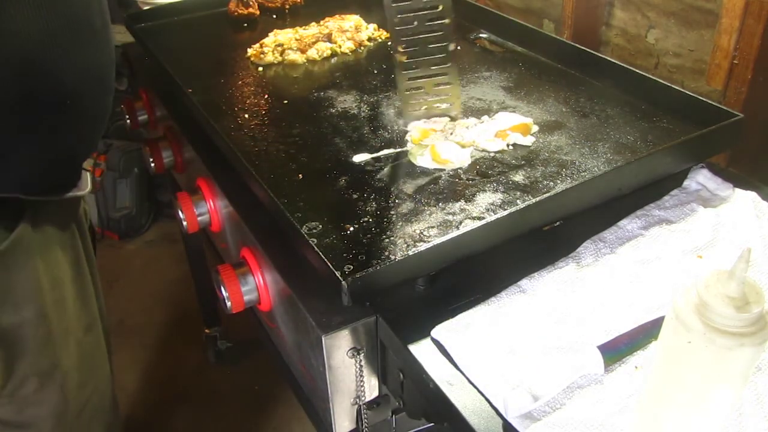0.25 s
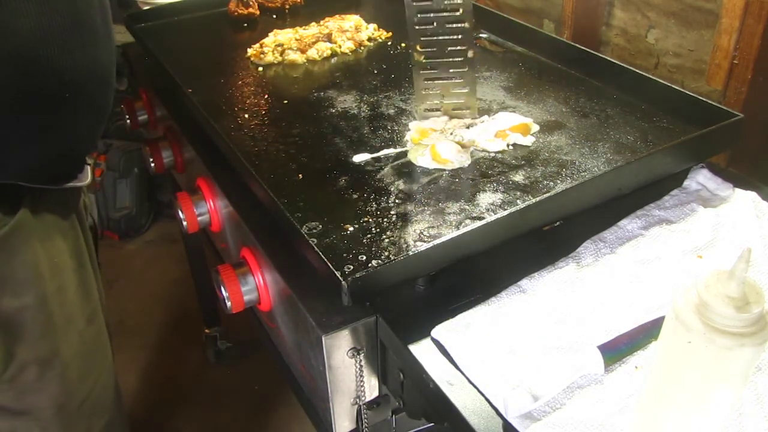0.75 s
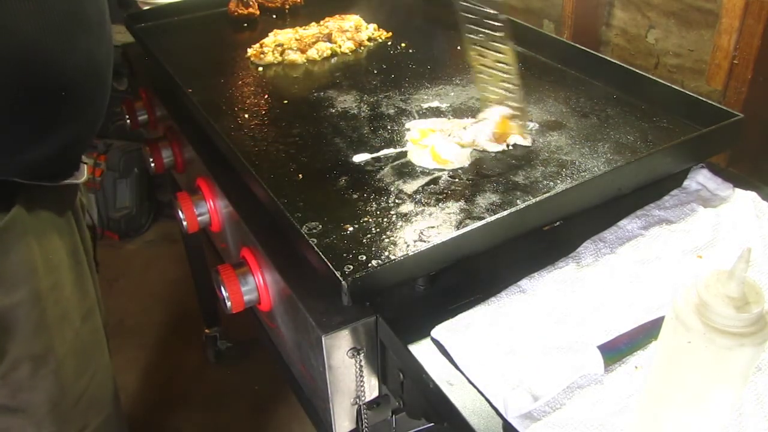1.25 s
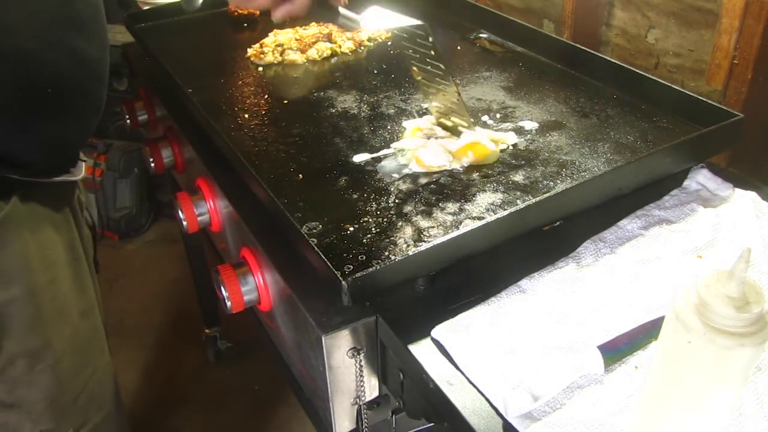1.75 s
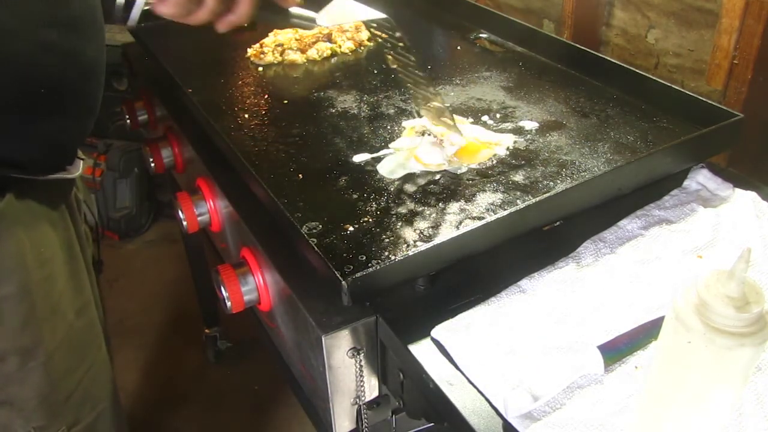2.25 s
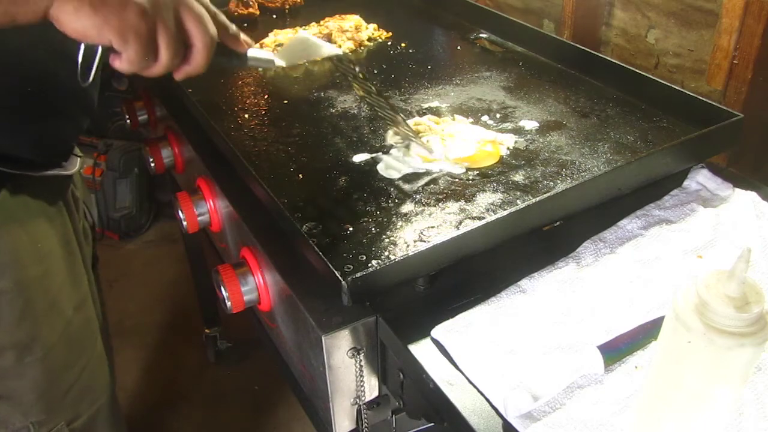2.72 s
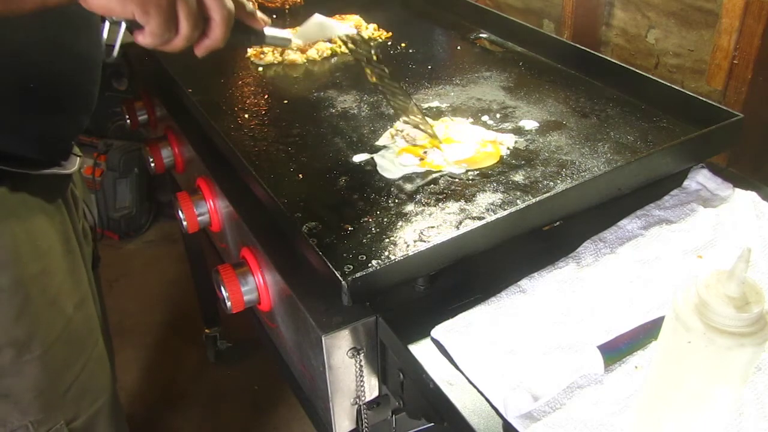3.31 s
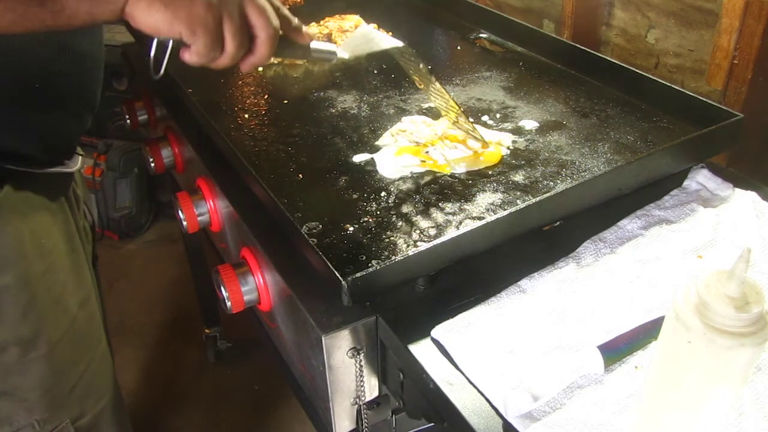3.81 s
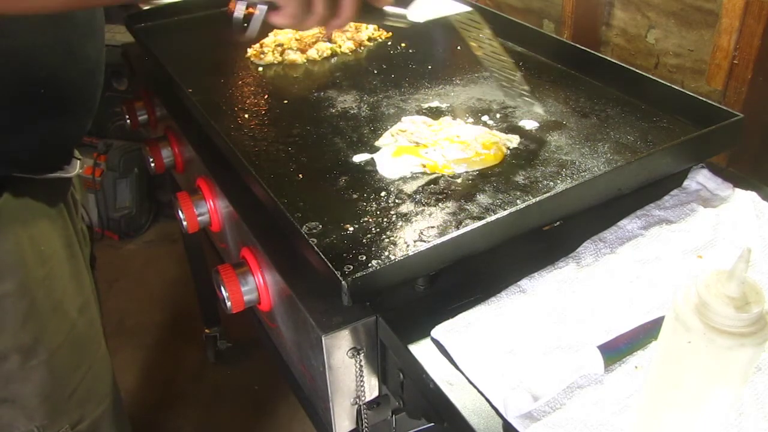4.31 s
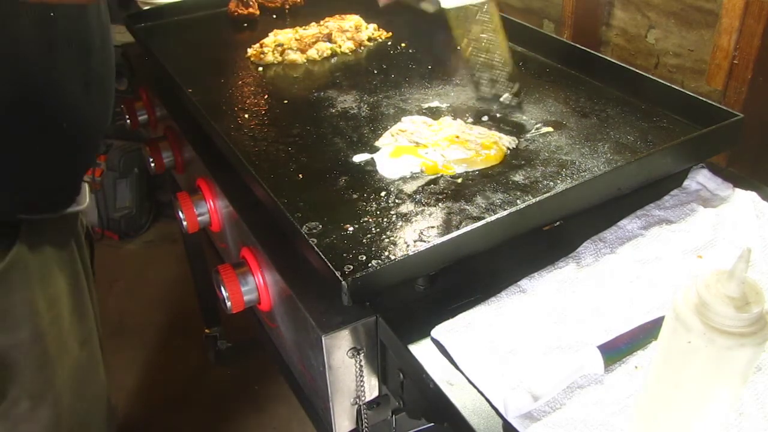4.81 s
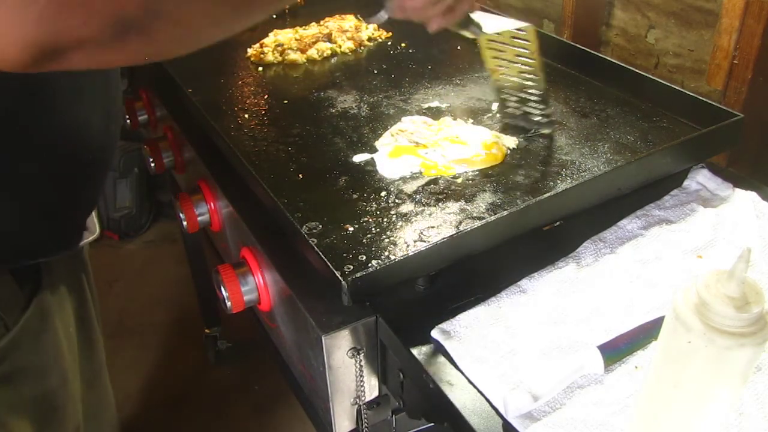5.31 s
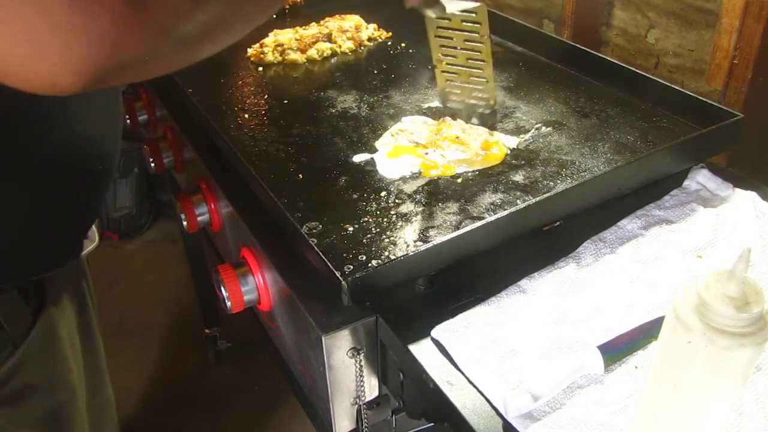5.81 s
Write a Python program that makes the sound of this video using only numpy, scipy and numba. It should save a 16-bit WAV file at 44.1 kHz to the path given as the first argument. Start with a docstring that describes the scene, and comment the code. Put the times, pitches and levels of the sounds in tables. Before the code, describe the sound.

For about six seconds, fat fries with a steady, bright hiss full of fine crackle, spread in stereo, above a very faint low burner rumble. Sharp, dry spits crowd the first 0.8 seconds, then scatter. A steel spatula touches the griddle dully at 0, slides grittily around 0.2, lands softly at 0.5 with another short singing scrape, and clanks more firmly at 1.1 before a fainter scrape. After a light touch at 1.7, chopping blows come from 2.05 to 4.0, roughly every 0.3 seconds, the first three brightest, later ones weaker. A clank at 4.4 leads into a brief scrape; the loudest clang rings at 4.8. Quick taps follow at 5.2 to 5.3 and a double tap at 5.6, each with a short slide, the last fading by 5.9. The metallic, inharmonic rings decay fast, with a short wooden-shed tail, as the sizzle eases slightly.

```python
"""Spatula on a hot griddle

A steel spatula chops and scrapes eggs on a flat steel griddle in a shed, for about six seconds.
Blows and slides of the blade ring the plate's many modes, each a decaying sine wave.
Fat spits in short pops and sizzles in filtered noise and clicks, over a soft burner rumble."""
import sys
import numpy as np
from scipy import signal
from scipy.fft import rfft, irfft, next_fast_len
from scipy.io import wavfile
from scipy.ndimage import uniform_filter1d
from numba import njit

SR = 44100
rng = np.random.default_rng(int(sys.argv[2]) if len(sys.argv) > 2 else 0)


def to_wav(s):
    """Save 16-bit WAV."""
    ch = np.atleast_2d(s).T  # columns
    pcm = np.round(np.clip(ch, -1, 1) * 32767)  # PCM
    wavfile.write(sys.argv[1], SR, pcm.astype(np.int16))


N = 266871  # samples


def undb(db):
    """Turn decibels into gain."""
    return 10 ** (np.asarray(db) / 20)


def level(x, db):
    """Scale a sound to an rms level in dB."""
    return x * undb(db) / np.sqrt(np.mean(x ** 2))


def on_log(hz, table, axis=1):
    """Read a table column between its rows, on a log-frequency axis."""
    rows = np.array(table, float)
    return np.interp(np.log(np.maximum(hz, 1)), np.log(rows[:, 0]), rows[:, axis])


def colour(x, table):
    """Filter a sound by a table of frequency in Hz and gain in dB."""
    size = next_fast_len(N)
    gain = undb(on_log(np.fft.rfftfreq(size, 1 / SR), table))
    return irfft(rfft(x, size) * gain, size)[..., :N]


def walk(rate):
    """Random wandering: values held for 1 / rate seconds, then smoothed twice; spread near 1."""
    hold = int(SR / rate)
    steps = np.repeat(rng.standard_normal(N // hold + 1), hold)
    smooth = uniform_filter1d(uniform_filter1d(steps, hold), hold)
    return np.sqrt(2) * smooth[:N]


# Colour of the flame rumble. Each row: frequency in Hz, relative gain in dB.
BURNER_COLOUR = [(15, -41), (25, 1), (43, -10), (65, 3), (118, 8), (178, -4.5), (199, 5), (289, -2.5),
                 (352, 4.5), (400, -37), (520, -52), (880, -120)]


def burner():
    """Low flame rumble: dark noise, almost the same on both sides, slowly wavering in level."""
    mid, side = colour(rng.standard_normal((2, N)), BURNER_COLOUR)
    pair = np.array([0.81 * mid + 0.053 * side, 0.95 * mid - 0.14 * side])
    waver_db = 0.55 * walk(2.66)
    return level(pair, -60.5) * undb(waver_db)


def crackle(rate, spread_db):
    """Bursting bubbles as clicks at random moments (rate per second), many small and few large."""
    size_db = spread_db * np.minimum(rng.exponential(size=N), 3.5)
    clicks = (rng.random(N) < rate / SR) * undb(size_db) * rng.choice([-1, 1], N)
    return level(clicks, 0)


# How the frying rises and falls; only changes around each column's mean count.
# Each row: time in seconds, treble in dB, middle in dB, top in dB.
FRYING_LEVELS = [(0, -37, -34, -34.5), (.08, -36.5, -38, -40), (.32, -39, -40, -41.5),
                 (.62, -39.5, -39.5, -43.5), (1.06, -42, -44, -43.5), (1.28, -38.5, -41.5, -43.5),
                 (1.53, -40.5, -40, -44.5), (1.8, -38.5, -38.5, -43.5), (2.63, -39.5, -39, -44),
                 (2.81, -37, -39.5, -42.5), (4.09, -39.5, -40.5, -41.5), (4.5, -39.5, -38, -43.5),
                 (5.04, -42.5, -41.5, -45), (5.36, -40.5, -46.5, -44.5), (5.76, -42.5, -40.5, -44.5),
                 (6.05, -44.5, -43, -48)]
# Colour of the frying. Each row: frequency in Hz, relative gain in dB.
FIZZ_COLOUR = [(180, -48), (300, -22), (354, -21), (385, -10.5), (511, -11), (930, -7), (994, -7),
               (1190, -6.5), (7320, -0.5), (13300, -5), (16000, -0.5)]
# Stereo width of the frying. Each row: frequency in Hz, gain of the side noise in dB.
FIZZ_WIDTH = [(300, -18), (1000, -11), (2000, -7), (4000, -6), (8000, -8), (11000, -9), (15000, -11)]


def sizzle(hiss_db=-0.5):
    """Hiss and crackle of frying; each band has bubbles of its own, larger ones click through all."""
    s, treble_db, middle_db, top_db = np.transpose(FRYING_LEVELS)
    t = np.arange(N) / SR
    large_bubbles = crackle(400, 11.0)
    shared_flicker_db = 0.26 * walk(8)
    low, middle, high = (1.66 * walk(9) for _ in range(3))  # flicker in dB
    bands = ((253, 3600, middle_db, low), (1920, 5180, middle_db, middle),
             (5000, 9600, treble_db, high), (9950, 14400, top_db, high))
    out = 0
    for lo_hz, hi_hz, db, flicker_db in bands:
        mid = undb(hiss_db) * rng.standard_normal(N)
        mid += undb(-7.0) * large_bubbles + undb(-4.5) * crackle(450, 3.9)
        side = colour(rng.standard_normal(N) + undb(-11) * crackle(300, 1.0), FIZZ_WIDTH)
        pair = colour(np.array([mid + side, mid - side]), FIZZ_COLOUR)
        bandpass = signal.butter(2, [lo_hz, hi_hz], "bandpass", fs=SR, output="sos")
        band = signal.sosfilt(bandpass, pair)
        out = out + band * undb(np.interp(t, s, db - np.mean(db)) + flicker_db + shared_flicker_db)
    return level(out, -34.5) * undb([[-.3], [.3]])  # slightly stronger on the right


# Big spits of fat, with levels before the high-pass and the shed.
# Each row: start in seconds, peak in dB, centre in Hz, left minus right in dB, cycles it lasts.
BIG_SPITS = [(0.0618, -10, 7010, 7, 1), (0.065, -10, 8150, 0, 1.3), (0.0832, -12, 8200, 0, 1.8),
             (0.2788, -8.5, 8600, -10, 1.6), (0.2858, -6.5, 8500, 2, 1.7), (0.354, -11, 8400, -1, 1.6),
             (0.3894, -12.5, 8060, -3, 2.1), (0.4222, -13, 8890, -1, 1.8), (0.461, -20, 3800, -8, 2.6),
             (0.52, -8.5, 5560, -0.5, 0.56), (0.5627, -8, 5000, 3, .9), (0.5953, -12, 6190, -5, .8),
             (0.7152, -5.5, 6750, -1, .8), (1.8761, -18, 3530, -11, 2.7), (2.1963, -14, 5840, -3, 1.4),
             (2.7525, -7, 5880, -2, 1), (2.777, -12, 8830, -1, 1.5), (2.7854, -12, 7260, -1, 1.2),
             (3.271, -13, 5350, -2, 1), (3.9272, -9.5, 8690, -7, 1.4), (3.9994, -12.5, 7220, 1, 1.4),
             (4.0799, -15, 7290, 2, 1.4), (5.5, -11, 7330, 4, .9), (5.556, -14.5, 3930, -2, 5),
             (5.7524, -11, 8420, -1, 1.1)]


def spits(count=30):
    """Single loud pops, big ones listed and small ones at chance: a wave that dies in a few cycles."""
    out = np.zeros((2, N + 256))
    t = np.arange(256) / SR
    when, size, pitch, side = rng.random((count, 4)).T
    small = np.c_[when * N / SR,
                  -19 + 3 * (2 * size - 1),  # peak dB
                  7000 * (.75 + .5 * pitch),  # Hz
                  6 * (2 * side - 1),  # left minus right dB
                  np.full(count, 1.3)]  # cycles
    for s, db, hz, pan_db, cycles in np.r_[BIG_SPITS, small]:
        pop = np.sin(2 * np.pi * hz * t) * np.exp(-2 * t * hz / max(cycles, .5))
        i = int(s * SR)
        ear_gain = undb(db + np.array([pan_db, -pan_db]) / 2)
        out[:, i:i + 256] += np.outer(ear_gain, pop / pop.max())
    highpass = signal.butter(2, 2000, "highpass", fs=SR, output="sos")
    return signal.sosfilt(highpass, out[:, :N])


def favour(hz, centre_hz, lift_db, width):
    """Lift in dB for modes close to the one that a spot on the plate excites best."""
    return lift_db * np.exp(-(np.log(hz / centre_hz) / width) ** 2)


@njit
def ring(pole, ears, grit, rub, block, at, knock):
    """Each mode is kicked at the blows and shaken by grit under the blade; each ear has its own phase."""
    out = np.zeros((2, len(grit)))
    for m in range(len(pole)):
        z, k = 0j, 0
        for i in range(len(grit)):
            z = z * pole[m] + grit[i] * rub[m, i // block]
            if i == at[k]:
                z, k = z + knock[m, k], k + 1
            out[0, i] += (z * ears[0, m]).imag
            out[1, i] += (z * ears[1, m]).imag
    return out


# Blade landings. Each row: start in seconds, clang level in dB, thud and body (near 900 Hz) in dB
# against the clang, treble tilt in dB per octave, low favoured mode in Hz, its lift in dB,
# high favoured mode in Hz, its lift in dB.
LANDINGS = [(0.002, -22.5, -11, -11, -12, 836, 17, 1505, 9.5),
            (0.538, -28, 0.5, 8, -2, 706, 11.5, 1447, 9.5),
            (1.097, -18, -8.5, 6.5, -6, 706, 5.5, 2680, 14.5),
            (1.724, -24, -3, -7, -2.5, 836, 12, 1505, 5.5),
            (2.061, -12.5, -15.5, -6, -1.5, 424, 9.5, 4400, 7),
            (2.349, -11.5, -19.5, -6.5, -1, 438, 7, 1940, 9.5),
            (2.646, -12, -16.5, -9.5, -3, 463, 5, 2100, 7.5),
            (2.96, -17, -14.5, -10.5, -7.5, 836, 12, 2250, 4),
            (3.225, -15, -15, -2.5, -6.5, 938, 12, 1675, 7), (3.5, -16, -17.5, -5.5, -6.5, 438, 7, 1657, 5),
            (3.762, -17.5, -12.5, -6, -1.5, 438, 6.5, 2285, 1.5),
            (4.017, -22.5, -10, 0, -9.5, 438, 9, 1505, 6),
            (4.398, -19.5, -12.5, 1, -7, 1012, 6.5, 1546, -4),
            (4.832, -8.5, -19, -6, -4.5, 1012, 11, 2244, 7), (5.234, -15.5, -19, -3, -3, 601, 11, 1657, 9),
            (5.312, -23.5, -14, -1.5, 2, 1082, 5, 1690, 2), (5.615, -23, -7.5, -7, -4, 601, 8, 1797, 6),
            (5.633, -17.5, -17, -2, -4.5, 706, 12, 1797, 9)]
# Where a landing's colour is set, in Hz: thud, body, clang, then two octaves above the clang.
LANDING_HZ = [350, 900, 1900, 7600]
# Blade slides. Each row: start, hardest push and end in seconds, level in dB at the hardest push,
# tilt there in dB per octave, singing mode in Hz, its lift in dB, second mode in Hz, its lift in dB.
SCRAPES = [(0.065, 0.18, .24, -24, 1.5, 1505, 10, 706, 8.5),
           (0.606, 0.662, .77, -23.5, 2.5, 1505, 8.5, 706, 10),
           (1.15, 1.256, 1.36, -26, -1, 1082, 2, 1546, 8),
           (4.43, 4.522, 4.64, -26.5, 2, 1546, 10.5, 438, 6.5),
           (5.284, 5.327, 5.45, -23, 3, 1707, 5, 601, 9),
           (5.663, 5.785, 5.93, -28, 4.5, 1505, 7.5, 2168, 3)]
# Colour of the slides. Each row: frequency in Hz, gain in dB.
SCRAPE_COLOUR = [(250, -18), (700, -2), (1500, 1), (3000, 0), (6000, -15), (11000, -18)]
# Clear modes of the plate.
# Each row: frequency in Hz, relative level in dB, seconds to fall 60 dB (held to 0.03-0.7 below).
CLEAR_MODES = [(220, -6.5, 0.26), (352.3, -4, 0.4), (438, 0.5, 0.44), (601, -7, 0.72), (706, -0.5, 0.44),
               (836, -16.5, 0.16), (849, -3, 0.5), (1012, -7.5, 0.9), (1082, -10, 1), (1290, -8.5, 0.56),
               (1447, -15, 0.17), (1505, -7, 0.74), (1546, -1.5, 0.32), (1657, -9, 0.27), (1675, -7, 0.42),
               (1707, -2, 0.18), (1797, -6.5, 0.17), (1992, -2.5, 0.49), (2062, -5, 0.32),
               (2100, -35, 0.54), (2168, -5.5, 0.38), (2176, -2, 0.48), (2285, -1, 0.32), (2310, -12, 0.41),
               (2477, -4, 0.15), (2830, -27, 0.38), (3390, -4, .25), (3560, -11.5, 0.37),
               (3805, -4.5, 0.35), (4520, -8, 0.22)]
# Close-packed modes between them, read between rows.
# Each row: frequency in Hz, relative level in dB, seconds to fall 60 dB (same limits).
PACKED_MODES = [(191, -18.5, 0.43), (430, -14, 0.5), (1060, -14.5, 0.36), (1850, -10.5, 0.38),
                (4080, -7.5, 0.14), (6480, -8.5, 0.049), (11600, -21.5, 0.096)]
# Which side hears the plate more. Each row: frequency in Hz, left minus right in dB.
PLATE_BALANCE = [(250, -3), (500, -1), (1000, -2.5), (2000, -3), (4000, -2), (9000, 1)]
BLOCK = 32  # samples per step of the rubbing force
CHATTER_DB, CHATTER_S = 1.5, .015  # chatter after a blow: strength, decay time in seconds
SWELL_DB, EASE_DB = -13, -21.5  # push at a slide's start and end, under its hardest
DULL_PER_DB = 0.1866  # dB per octave of tilt lost for each dB of lighter push
SING_DB = -24  # sine amplitude, against grit at rms 1
LOW_WIDTH, HIGH_WIDTH = 0.039, 0.04  # reach of a lift in log frequency; up high a cluster rings together


def griddle(count=300, spot_db=2.0, phase_per_khz=0.27, grit_db=1.5):
    """The plate's modes, driven by blows, the chatter after them and slides."""
    dense = np.geomspace(200, 11000, count) * (1 + 0.00995 * rng.standard_normal(count))
    hz = np.r_[[m[0] for m in CLEAR_MODES], dense]
    db = np.r_[[m[1] for m in CLEAR_MODES], on_log(dense, PACKED_MODES)]
    t60 = np.r_[[m[2] for m in CLEAR_MODES], on_log(dense, PACKED_MODES, axis=2)]
    t60 = np.clip(t60, .03, .7)
    pole = np.exp((2j * np.pi * hz - np.log(1000) / t60) / SR)  # one sample of turning and decay
    shake = np.sqrt(1 - np.abs(pole) ** 2)  # evens out how strongly steady noise rings each mode
    gain = rng.choice([-1, 1], len(hz)) * undb(db) / np.sqrt(np.sum(undb(db) ** 2))

    blows = np.array(LANDINGS, float)
    t = np.arange(N // BLOCK + 1) * BLOCK / SR
    knock = np.zeros((len(hz), len(blows)))
    rub = np.full((len(hz), len(t)), 1e-9)
    for k, (s, peak_db, thud_db, body_db, tilt_db, hz1, db1, hz2, db2) in enumerate(blows):
        tone_db = peak_db + thud_db, peak_db + body_db, peak_db, peak_db + 2 * tilt_db
        # every landing spot sits differently on each mode shape
        spot = spot_db * rng.standard_normal(len(hz))
        spot += favour(hz, hz1, db1, LOW_WIDTH) + favour(hz, hz2, db2, HIGH_WIDTH)
        size = gain * undb(on_log(hz, list(zip(LANDING_HZ, tone_db))) + spot)
        knock[:, k] = size * rng.choice([-1, 1], len(hz))
        fade = (t > s) * np.exp(-np.maximum(t - s, 0) / CHATTER_S)
        rub += undb(CHATTER_DB) * np.outer(size * shake, fade)

    # grit is noise with uneven grains
    grain_db = grit_db * np.minimum(rng.exponential(size=N), 5)
    grit = level(rng.standard_normal(N) * undb(grain_db), 0)
    for *s, push_db, tilt_db, hz1, db1, hz2, db2 in SCRAPES:
        on = np.flatnonzero((t >= s[0]) & (t <= s[-1]))
        spot = on_log(hz, SCRAPE_COLOUR) + spot_db * rng.standard_normal(len(hz))
        spot = spot + favour(hz, hz1, db1, width=0.072) + favour(hz, hz2, db2, width=0.027)
        under_db = np.interp(t[on], s, [SWELL_DB, 0, EASE_DB])
        octaves = np.log2(hz / 1500)
        force_db = push_db + under_db + np.outer(octaves, tilt_db + DULL_PER_DB * under_db)
        # stick and slip lock on to the favoured mode, so it sings steadily
        i = np.arange(int(s[0] * SR), int(s[-1] * SR))
        locked_hz = hz[np.argmin(abs(hz[:len(CLEAR_MODES)] - hz1))]
        grit[i] += undb(SING_DB) * np.sin(2 * np.pi * locked_hz * i / SR)
        rub[:, on] += (gain * shake * undb(spot))[:, None] * undb(force_db)

    # the two ears differ in level and phase for each mode
    turn = phase_per_khz * np.minimum(hz / 1000, 3) * rng.standard_normal(len(hz)) / 2
    lean = undb(on_log(hz, PLATE_BALANCE) / 2) * np.exp(1j * turn)
    ears = np.array([lean, 1 / lean])
    at = np.r_[(blows[:, 0] * SR).astype(int), -1]  # -1 ends the list
    plate = ring(pole, ears, grit, rub, BLOCK, at, knock)
    # the plate's sound is cut steeply below 190 Hz
    highpass = signal.butter(6, 190, "highpass", fs=SR, output="sos")
    return signal.sosfilt(highpass, plate)


def shed(x, t60=0.15, wet_db=-7.5, wide=0.44):
    """A short diffuse tail from the wooden walls: fading noise, much alike on both sides."""
    t = np.arange(int(.4 * SR)) / SR
    fade = np.exp(-np.log(1000) * t / t60) * (t > .004)  # starts after 4 ms
    mid, side = rng.standard_normal((2, len(t))) * fade
    padded = np.pad(side, (0, N - len(t)))
    side = wide * colour(padded, [(300, -6.5), (2000, 3)])[:len(t)]
    tail = np.array([mid + side, mid - side]) / np.sqrt(np.sum(mid ** 2))
    return x + undb(wet_db) * signal.fftconvolve(x, tail, axes=1)[:, :N]


def scene():
    """Plate and pops ring in the shed, over frying and flame."""
    return shed(griddle() + spits()) + sizzle() + burner()


def record(dry):
    """A steep low-pass filter removes the top, above 15.9 kHz."""
    lowpass = signal.ellip(10, .2, 80, 15900, fs=SR, output="sos")
    return signal.sosfilt(lowpass, dry)


dry = scene()
out = record(dry)
to_wav(out)
```